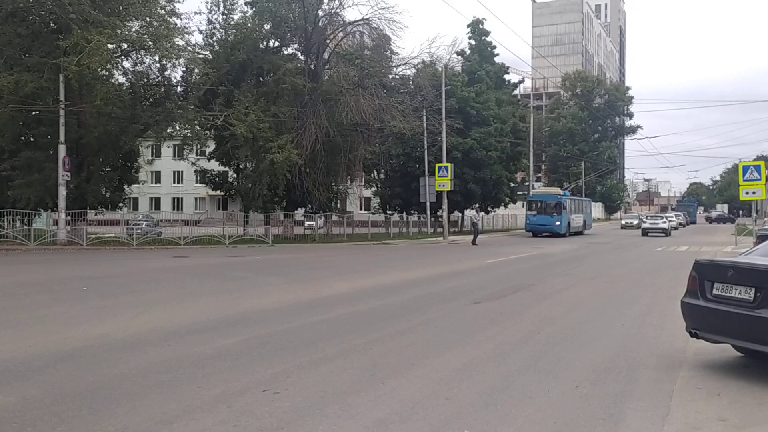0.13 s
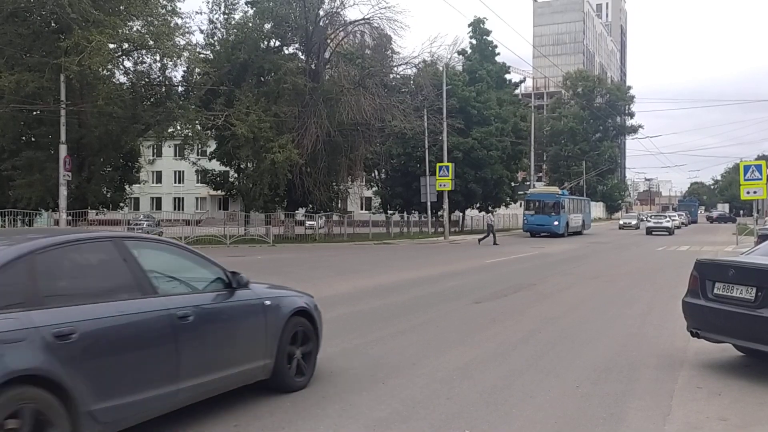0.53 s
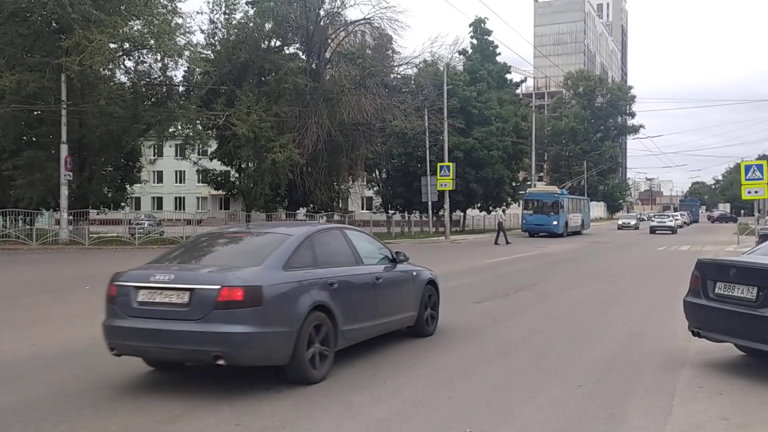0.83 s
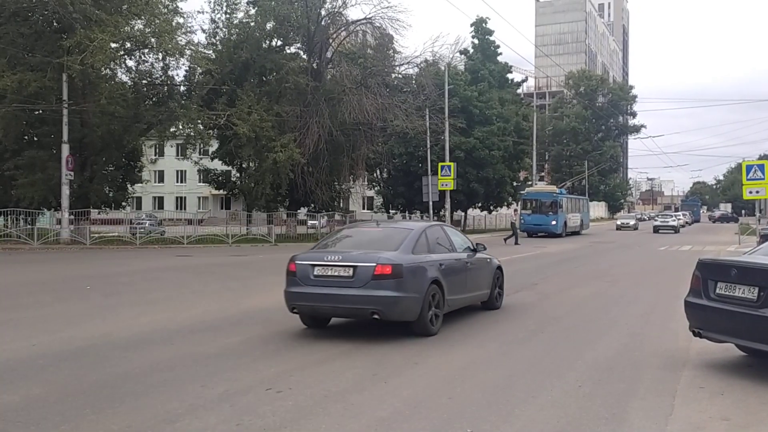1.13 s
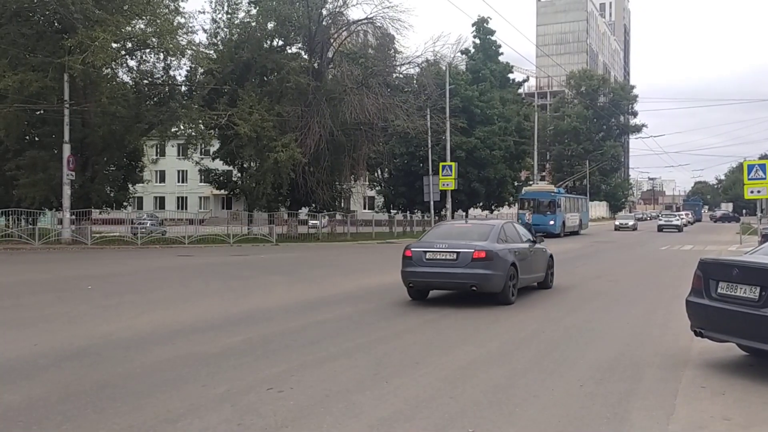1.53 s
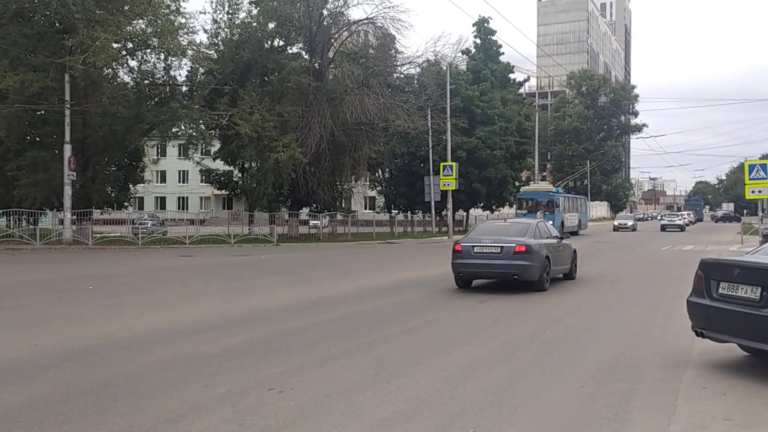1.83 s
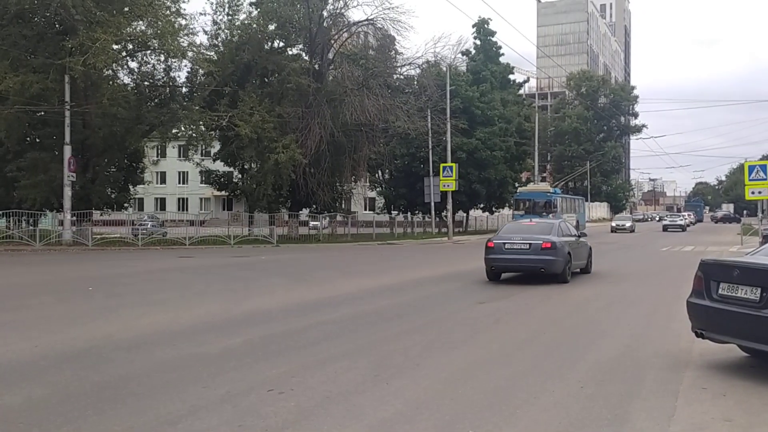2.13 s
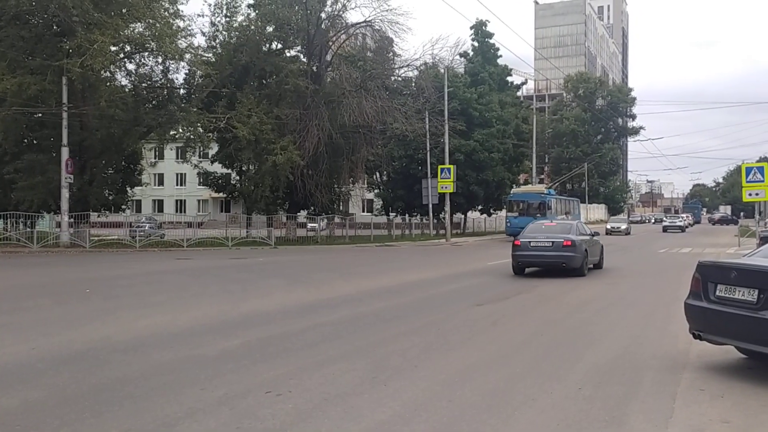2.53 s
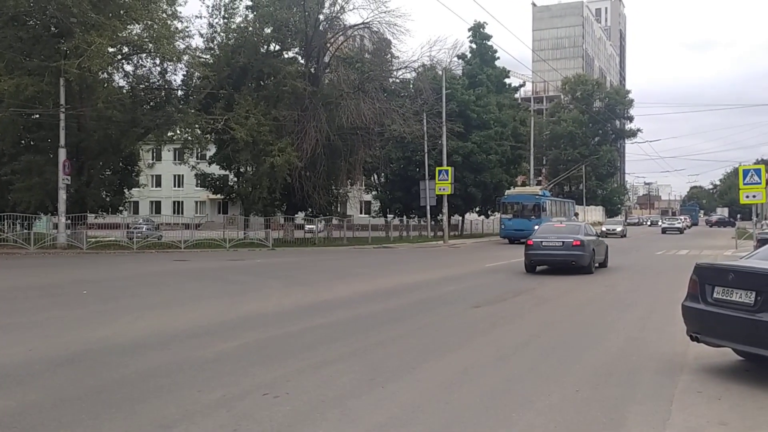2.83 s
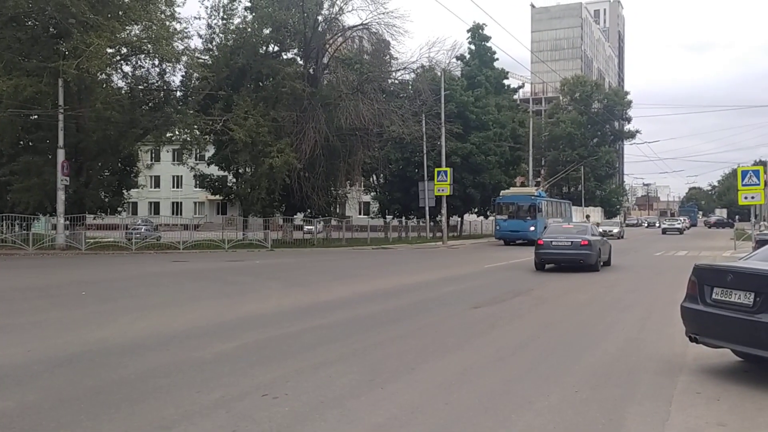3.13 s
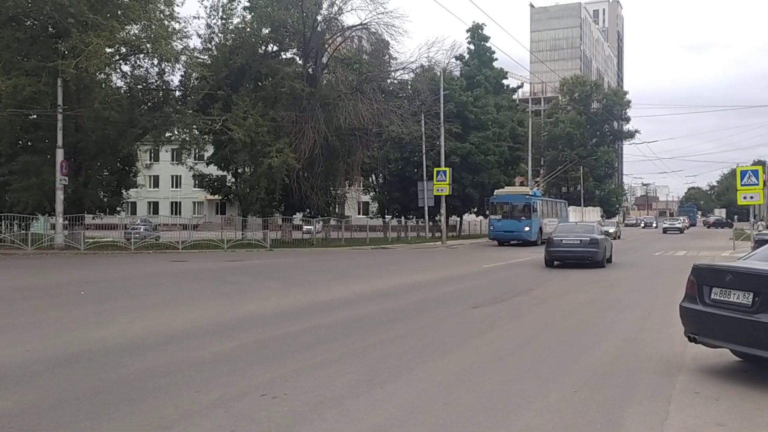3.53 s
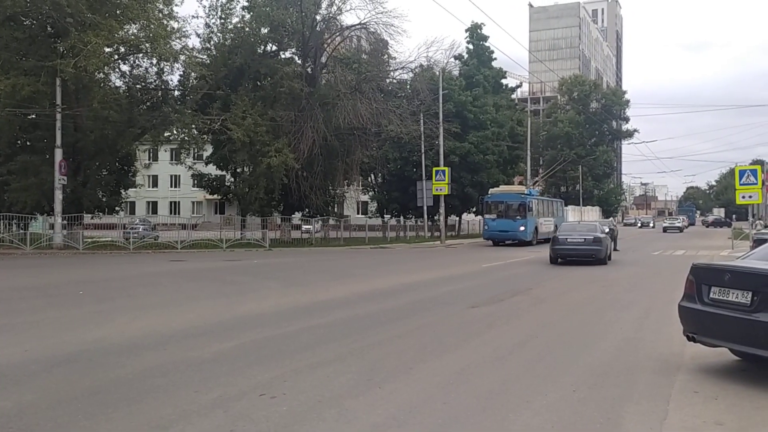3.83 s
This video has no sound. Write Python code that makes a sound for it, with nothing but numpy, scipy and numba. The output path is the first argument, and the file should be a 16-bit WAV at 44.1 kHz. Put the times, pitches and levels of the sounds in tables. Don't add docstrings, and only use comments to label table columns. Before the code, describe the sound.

A car sweeps past a phone at the kerb, its broad tyre rush bright then duller and quieter, with low wind rumble mostly on the right, a short air-brake hiss and faint distant traffic.

```python
import sys
import numpy as np
from scipy import signal
from scipy.fft import rfft, irfft
from scipy.io import wavfile
from scipy.ndimage import uniform_filter1d
from numba import njit

SR = 44100
rng = np.random.default_rng(int(sys.argv[2]) if len(sys.argv) > 2 else 0)


def persist_wave(psi):
    counts = np.round(np.clip(psi, -1, 1) * 32767).astype(np.int16)
    wavfile.write(sys.argv[1], SR, np.atleast_2d(counts).T)


def boost_factor(decibels):
    exponent = np.asarray(decibels, float) / 20
    return 10 ** exponent


N = 176400
T = np.arange(N) / SR
BAND_HZ = 45 * 2 ** (np.arange(17) / 2)

# freq_hz, density_db_per_hz
TOWN_SPECTRUM = [(60, 6), (200, -6), (400, -12), (800, 0), (1200, -21.5), (2500, -10.5), (5000, -11.5),
                 (13000, -28)]
# peak_s, peak_db, half_width_s
GUSTS_LEFT = [(0.351, -32, 0.046), (0.598, -44, 0.075), (0.914, -42, 0.11), (1.505, -47, 0.063),
              (1.705, -45, 0.11), (1.882, -45, 0.078), (2.078, -31.5, 0.069), (2.116, -26, 0.014),
              (2.909, -38, 0.046), (3.331, -42.5, 0.13), (3.513, -40, 0.039), (3.737, -46.5, 0.079),
              (3.962, -41, 0.054)]
GUSTS_RIGHT = [(0.272, -19.5, 0.11), (0.609, -32.5, 0.077), (0.844, -53, 0.052), (0.989, -15.5, 0.012),
               (1.01, -21.5, 0.052), (1.097, -26, 0.03), (1.187, -31, 0.049), (1.566, -17, 0.0091),
               (1.605, -26.5, 0.09), (1.652, -18.5, 0.035), (1.854, -29, 0.026), (1.961, -22.5, 0.052),
               (2.059, -21, 0.014), (2.121, -14, 0.011), (2.229, -27, 0.092), (2.248, -27, 0.018),
               (2.606, -35.5, 0.023), (2.703, -30.5, 0.0145), (2.787, -42, 0.12), (2.995, -21, 0.049),
               (3.091, -21, 0.049), (3.214, -26, 0.02), (3.313, -20, 0.036), (3.501, -26, 0.1),
               (3.504, -17.5, 0.017), (3.546, -20.5, 0.019), (3.737, -31, 0.036), (3.972, -25, 0.035)]
# breeze_db, flutter_hz, flutter_width_hz, flutter_db, rumble_hz, rumble_db
WIND_LEFT = (-56.5, 182, 205, -3, 38, 0)
WIND_RIGHT = (-55.5, 170, 116, -3.5, 29.5, -3)
# centre_hz, width_hz, gain_db
CAVITIES_LEFT = [(131, 20, -13.5), (419, 92, -12), (4750, 680, -4), (6200, 2000, 6), (10770, 1650, -15.5),
                 (12600, 2400, -11.5)]
CAVITIES_RIGHT = [(488, 186, -9), (806, 83, 3.5), (1230, 170, 0), (1740, 310, 6.5), (2700, 160, 3.5),
                  (3190, 430, -12), (3820, 560, -3), (5350, 1900, -7.5), (8750, 2460, 11),
                  (10100, 1770, -4.5), (11900, 2350, -17)]
# freq_hz, density_db_per_hz
TYRE_SPECTRUM = [(60, -17), (200, -0.5), (400, 1.5), (750, -1), (2000, -2), (4000, -13.5), (8000, -26),
                 (13000, -25.5)]
# time_s, level_db
CAR_LEVEL = [
    (0.35, -23.5),
    (0.62, -23.5),
    (0.77, -24),
    (0.78, -23.5),
    (0.88, -25),
    (1.44, -30.5),
    (3.12, -42.5),
    (3.87, -43.5),
    (4.0, -43),
]

HISS_DB, START_S, FADE_S, TOP_HZ = -62, 0.3402, 0.003, 13450
SCATTER_MIN, DULL_PER_OCTAVE = 0.2, 0.067

TOWN_DB, TOWN_SCATTER_HZ, TOWN_FLICKER_DB = -42.5, 1500, 0.6
TOWN_LAG_S, TOWN_SWELL_DB, TOWN_SWELL_PER_S = 0.00027, 0.4, 1.5

SQUEAL_HZ, SQUEAL_WIDTH_HZ, SQUEAL_FROM_S, SQUEAL_RISE_S = 7610, 50, 2, 0.34
SQUEAL_DB, SQUEAL_RIGHT_DB, SQUEAL_WAVER_DB = -59, -5.5, 1.5
VENT_S, VENT_ATTACK_S, VENT_DECAY_S, VENT_HOLD_S, VENT_RELEASE_S = 2.472, 0.022, 0.19, 0.18, 0.06
VENT_DB, VENT_RIGHT_DB, VENT_HZ, VENT_WIDTH_HZ = -35, -7, 5400, 3700
VENT_SAG, VENT_SAG_S = 0.17, 0.024
VENT_LOW_DB, VENT_LOW_HZ, VENT_LOW_WIDTH_HZ = -4, 3580, 2500

FLUTTER_RISE_PER_DB, EDDY_DB = 0.012, 2.5
RUMBLE_FOLLOW = 0.76
STEADY = 0.7

AXLE_PASS_S, REAR_DB = (0.72, 0.78), 2
BEARING_S, PORT_LAG_S = 0.34, 0.00023
CAR_DB, CAR_SCATTER_HZ, TREAD_FLICKER_DB = 0.5, 3370, 0.6
GRIT_DB, GRIT_PER_S, GRIT_SPREAD_DB = -18, 2000, 10.5
BRIGHT_DB, BRIGHT_HZ, BRIGHT_FADE_S = (11.5, 3), 4200, 0.38
NOSE_DB, NOSE_HZ, NOSE_OCTAVES, NOSE_FADE_S = 2.5, 755, 0.37, 0.34


def unit(x):
    return x / np.sqrt(np.mean(x ** 2))


@njit
def svf(x, hz, width):
    y, band, low = np.empty(len(x)), 0., 0.
    for i in range(len(x)):
        g, k = np.tan(np.pi * hz[i] / SR), width / hz[i]
        v = (band + g * (x[i] - low)) / (1 + g * (g + k))
        band, low, y[i] = 2 * v - band, low + 2 * g * v, k * v
    return y


def fixed_band(x, hz, width_hz):
    return svf(x, np.full(N, float(hz)), float(width_hz))


def walk(rate_hz):
    hold = int(SR / rate_hz)
    steps = np.repeat(rng.standard_normal(N // 500 + 2)[:N // hold + 1], hold)
    return 1.86 * uniform_filter1d(uniform_filter1d(steps, hold), hold)[:N]


def late(x, lag_s):
    return np.array([x, np.interp(T - lag_s, T, x)])


def bands(x):
    spectrum = rfft(x)
    octave = np.log2(np.arange(N // 2 + 1) * SR / N + 1)
    return [irfft(spectrum * np.clip(1 - 2 * abs(octave - np.log2(hz)), 0, 1), N) for hz in BAND_HZ]


def roar(direct, spectrum, scatter_hz, away_db, flicker_db, bright_db=0, nose_db=0):
    table_hz, table_db = np.array(spectrum).T
    scattered = rng.standard_normal((2, N))
    out, power = 0, 0
    for hz, near, wide in zip(BAND_HZ, bands(direct), bands(scattered)):
        share = np.clip(SCATTER_MIN + (hz / scatter_hz) ** 2, 0, 1)
        tone = boost_factor(np.interp(np.log(hz), np.log(table_hz), table_db))
        level_db = away_db * (1 + DULL_PER_OCTAVE * np.log2(hz / 1200))
        level_db = level_db + bright_db / (1 + (BRIGHT_HZ / hz) ** 4)
        level_db = level_db + nose_db * np.exp(-(np.log2(hz / NOSE_HZ) / NOSE_OCTAVES) ** 2)
        level_db = level_db + flicker_db * walk(8.86)
        out = out + tone * boost_factor(level_db) * (np.sqrt(1 - share) * near + np.sqrt(share) * wide)
        power += tone ** 2 * hz
    return out / np.sqrt(power / SR * 0.46)


def hiss():
    return boost_factor(HISS_DB) * rng.standard_normal((2, N))


def town():
    direct = late(rng.standard_normal(N), TOWN_LAG_S)
    swell = boost_factor(TOWN_DB + TOWN_SWELL_DB * walk(TOWN_SWELL_PER_S))
    return swell * roar(direct, TOWN_SPECTRUM, TOWN_SCATTER_HZ, 0, TOWN_FLICKER_DB)


def brake_squeal():
    hz = SQUEAL_HZ * (1 + 0.002 * walk(10))
    squeal = unit(svf(rng.standard_normal(N), hz, float(SQUEAL_WIDTH_HZ)))
    squeal = squeal * np.clip((T - SQUEAL_FROM_S) / SQUEAL_RISE_S, 0, 1)
    level = boost_factor(SQUEAL_DB + SQUEAL_WAVER_DB * walk(8.12))
    return level * squeal * boost_factor(np.array([[0], [SQUEAL_RIGHT_DB]]))


def air_brake():
    since_s = np.clip(T - VENT_S, 0, 9)
    puff = np.clip((T - VENT_S) / VENT_ATTACK_S, 0, 1) * np.exp(-since_s / VENT_DECAY_S)
    puff = puff * np.exp(-np.clip(T - VENT_S - VENT_HOLD_S, 0, 9) / VENT_RELEASE_S)
    hz = VENT_HZ * (1 + VENT_SAG * np.exp(-since_s / VENT_SAG_S))
    jet = []
    for noise in rng.standard_normal((2, N)):
        high = unit(svf(noise, hz, float(VENT_WIDTH_HZ)))
        low = unit(fixed_band(noise, VENT_LOW_HZ, VENT_LOW_WIDTH_HZ))
        jet.append(high + boost_factor(VENT_LOW_DB) * low)
    return boost_factor(VENT_DB) * puff * np.array(jet) * boost_factor(np.array([[0], [VENT_RIGHT_DB]]))


def even(x, size):
    return unit(x / uniform_filter1d(x ** 2, size) ** (STEADY / 2))


def wind(gusts, breeze_db, flutter_hz, width_hz, flutter_db, rumble_hz, rumble_db):
    gust_power = sum(boost_factor(db) ** 2 * np.exp(-((T - s) / w) ** 2) for s, db, w in gusts)
    force = np.sqrt(boost_factor(breeze_db) ** 2 + gust_power)
    hz = flutter_hz * np.exp(FLUTTER_RISE_PER_DB * (20 * np.log10(force) + 26))
    flutter = svf(rng.standard_normal(N), hz, 1. * width_hz)
    flutter = unit(svf(flutter, hz, 2. * width_hz))
    flutter = svf(flutter, hz, 2.1 * width_hz)
    rumble = fixed_band(rng.standard_normal(N), rumble_hz, 2 * rumble_hz)
    rumble = unit(fixed_band(rumble, rumble_hz, 2.4 * rumble_hz))
    flutter = boost_factor(flutter_db + EDDY_DB * walk(60)) * even(flutter, 1300)
    rumble = boost_factor(rumble_db) * (force / boost_factor(-27)) ** (RUMBLE_FOLLOW - 1) * even(rumble, 3000)
    return force * (flutter + rumble)


def tread():
    ticks = (rng.random(N) < GRIT_PER_S / SR) * rng.standard_normal(N)
    grit = ticks * boost_factor(GRIT_SPREAD_DB * rng.exponential(size=N))
    return rng.standard_normal(N) + boost_factor(GRIT_DB) * unit(grit)


def car():
    direct = 0
    for pass_s, db in zip(AXLE_PASS_S, (0, REAR_DB)):
        lag_s = PORT_LAG_S * (T - pass_s) / np.hypot(T - pass_s, BEARING_S)
        direct = direct + boost_factor(db) * late(tread(), lag_s)
    level_db = np.interp(T, *np.array(CAR_LEVEL).T)
    peak_db = level_db.max()
    bright_db = np.array(BRIGHT_DB)[:, None] * np.exp(-((T - START_S) / BRIGHT_FADE_S) ** 2)
    nose_db = NOSE_DB * np.exp(-((T - START_S) / NOSE_FADE_S) ** 2)
    tyres = roar(unit(direct), TYRE_SPECTRUM, CAR_SCATTER_HZ, level_db - peak_db, TREAD_FLICKER_DB,
                 bright_db, nose_db)
    return boost_factor(CAR_DB + peak_db) * tyres


def port(x, cavities):
    hz = np.arange(N // 2 + 1) * SR / N
    gain_db = sum(db / (1 + (2 * (hz - f) / w) ** 2) for f, w, db in cavities)
    return irfft(rfft(x) * boost_factor(gain_db), N)


def scene():
    street = hiss() + town() + brake_squeal() + air_brake() + car()
    left = port(street[0], CAVITIES_LEFT) + wind(GUSTS_LEFT, *WIND_LEFT)
    right = port(street[1], CAVITIES_RIGHT) + wind(GUSTS_RIGHT, *WIND_RIGHT)
    return np.array([left, right])


def top_cut(x):
    return signal.sosfilt(signal.butter(12, 14070, fs=SR, output="sos"), x)


def record(dry):
    low_pass = signal.ellip(8, 0.3, 60, TOP_HZ, fs=SR, output="sos")
    mix = signal.sosfilt(low_pass, dry)
    mix = mix * np.clip((T - START_S) / FADE_S, 0, 1) ** 2
    return top_cut(mix)


dry = scene()
out = record(dry)
persist_wave(out)
```